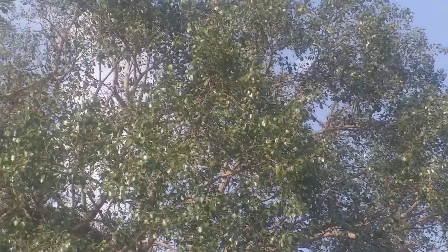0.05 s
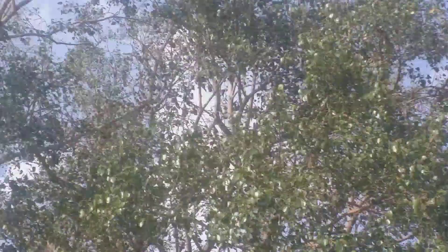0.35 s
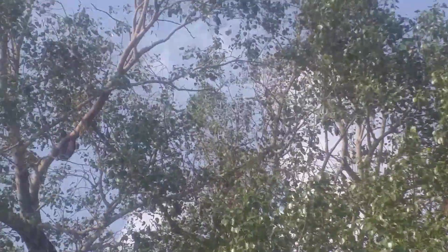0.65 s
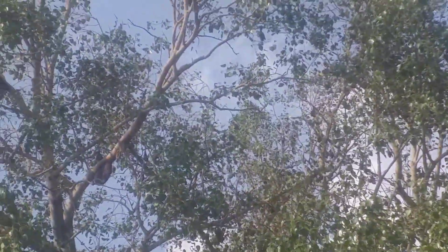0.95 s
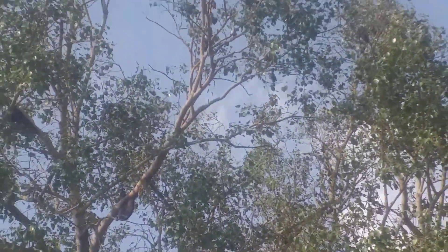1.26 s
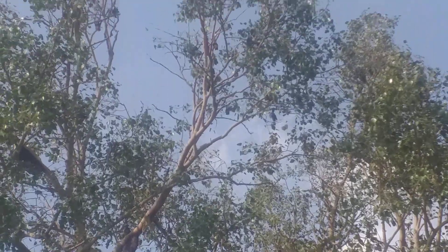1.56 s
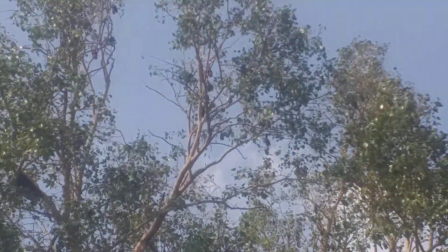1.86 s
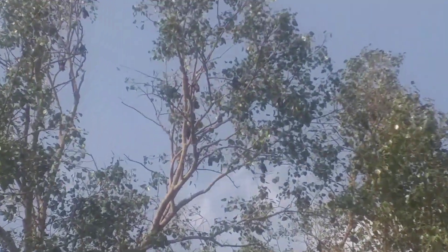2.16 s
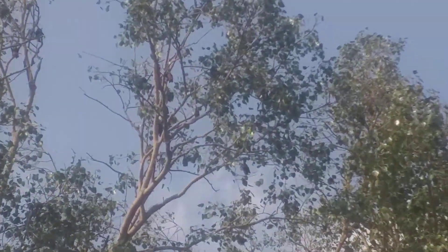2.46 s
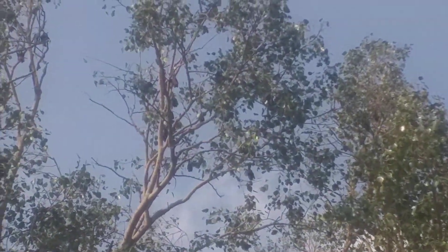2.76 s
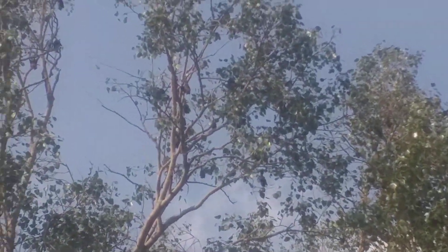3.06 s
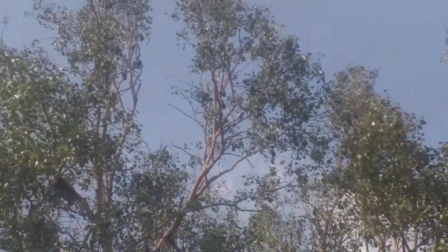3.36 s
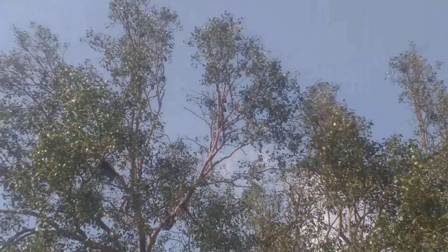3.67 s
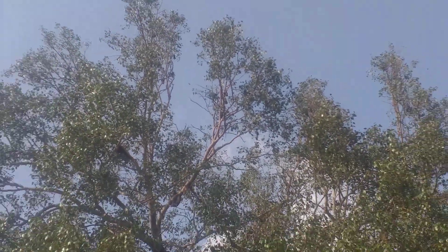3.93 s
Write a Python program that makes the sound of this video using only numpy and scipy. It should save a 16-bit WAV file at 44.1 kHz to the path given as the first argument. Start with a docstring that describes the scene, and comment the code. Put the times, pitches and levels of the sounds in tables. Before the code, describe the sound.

A bat or bird screeches once outdoors while insects buzz and the microphone gets bumped.

```python
"""A screech among trees

A bat or a bird gives one harsh screech that holds high, then falls; the trees throw it back.
Insects buzz throughout and small birds whistle far off, over a soft wash of outdoor air.
Close by, dry grains of sound make faint rustles, twigs tick, and handling bumps the microphone."""
import sys
import numpy as np
from scipy import signal
from scipy.fft import rfft, irfft
from scipy.io import wavfile
from scipy.ndimage import uniform_filter1d

SR = 44100
rng = np.random.default_rng(int(sys.argv[2]) if len(sys.argv) > 2 else 0)


def wrap_up_sound(samples):
    """Save the sound to the file named by the first command line argument, as 16-bit audio."""
    columns = np.atleast_2d(samples).T
    # keep every value between -1 and 1, then stretch to whole-number steps
    tamed = np.clip(columns, -1, 1)
    steps = np.round(tamed * 32767).astype(np.int16)
    wavfile.write(sys.argv[1], SR, steps)


N = 176400
TIME = np.arange(N) / SR

# The screech. Each row: time in seconds, pitch in Hz, level in dB, rasp from 0 (tone) to 1 (noise).
SCREECH_PATH = [(1.556, 4480, -53, .5), (1.584, 4620, -43, .45), (1.668, 4830, -42, .55),
                (1.688, 4450, -46, .8), (1.735, 4490, -40, .5), (1.75, 3850, -45, .9),
                (1.77, 3250, -44.5, .9), (1.8, 2720, -44, .8), (1.83, 2570, -46, .65),
                (1.862, 2570, -51, .55), (1.895, 2500, -68, .5)]
# Its harmonics. Each row: multiple of the pitch, width in Hz, relative level in dB.
HARMONICS = [(1, 280, -1.5), (2, 1500, -15), (3, 3000, -18)]
# Where the throat rings. Each row: frequency in Hz, width in Hz, dB at high pitch, dB at low pitch.
THROAT_RINGS = [(2850, 280, -19, -10), (4000, 1300, -26, -8), (4860, 300, -8, -9), (5450, 900, -6, -9),
                (6600, 1300, -5, -1.5), (14200, 2000, -21, -20)]
# The echo of the trees. Each row: frequency in Hz, seconds it takes to fade by 60 dB.
ECHO_FADE = [(2700, 0.49), (5500, 0.52), (15000, 0.35)]
# The nearest insect. Each row: time in seconds, pitch in Hz, level in dB.
BUZZ_PATH = [(0, 6950, -65), (1.15, 7080, -57), (1.9, 6880, -60.5), (2.66, 7060, -54.5),
             (2.78, 7540, -56.5), (2.86, 6300, -62), (3.16, 7050, -58), (3.66, 7110, -53),
             (3.88, 7140, -73)]
# The insect chorus. Each row: pitch in Hz, width in Hz, level in dB.
CHORUS_BANDS = [(6994, 510, -62), (7530, 300, -64.5), (6560, 700, -64), (9520, 830, -73.5),
                (4780, 820, -70.5)]
# Bird whistles. Each row: start and length in seconds, first, middle and last pitch in Hz, level in dB.
BIRD_WHISTLES = [(0.243, 0.062, 2780, 3320, 2900, -63), (1.058, 0.062, 3200, 3035, 3000, -65.5),
                 (2.036, 0.082, 2280, 2043, 1977, -64), (3.117, .1, 2860, 2735, 2790, -60.5)]
# Bumps on the microphone. Each row: time in seconds, level in dB.
BUMPS = [(.765, -44), (0.913, -47.5), (1.103, -46), (1.398, -45), (1.61, -41), (1.709, -40.5),
         (1.826, -38.5), (2.073, -44), (2.143, -43), (2.217, -32), (2.247, -32), (2.309, -41), (2.425, -36),
         (2.518, -36.5), (2.573, -35.5), (2.682, -40), (2.875, -38.5), (2.964, -28.5), (3.015, -30.5),
         (3.039, -31), (3.076, -36), (3.318, -27), (3.349, -36.5), (3.413, -42.5), (3.845, -43)]
# The rumble under them. Each row: time in seconds, level in dB.
RUMBLE_LEVELS = [(0, -67), (1.5, -62.5), (2.5, -47), (2.77, -56.5), (3.02, -45.5), (3.45, -61.5)]
# Rustles. Each row: peak time, rise and fall in seconds, level in dB, treble over bass in dB.
RUSTLE_SWELLS = [(.46, 0.1, 0.092, -55, 2), (.535, 0.037, 0.022, -54.5, 3), (.83, 0.086, 0.13, -54.5, 6),
                 (1.25, 0.17, 0.67, -56.5, 3.5), (3.79, 0.17, 0.22, -60, -10.5)]
# Twig ticks. Each row: time in seconds, level in dB, pitch in Hz.
TWIG_TICKS = [(0.43, -47, 4130), (0.5157, -39, 4860), (0.538, -46, 4460), (0.884, -43, 5100),
              (0.952, -45, 4900), (1.1088, -38.5, 4200), (1.136, -45, 5500), (3.805, -40.5, 3770)]
# The tone of the rumble, the rustles and the air. Each row: frequency in Hz, relative level in dB.
RUMBLE_TONE = [(85, 3), (260, -21), (450, -35), (1000, -56)]
RUSTLE_TONE = [(300, -25), (1700, -17.5), (4200, 0.5), (6000, 1.5), (8500, -10.5), (11000, -9), (13500, -5)]
AIR_TONE = [(25, -10), (70, 8), (500, -1.5), (1700, -3.5), (3100, 4), (4400, 10), (5500, 5.5), (10000, 2),
            (12000, -8), (15500, -4.5)]


def screech(pulses_per_s=670, high_hz=4200, low_hz=2960, shrill_below_hz=2770):
    """A shaky tone breaks up into uneven pulses that make its harmonics and the throat ring."""
    hz, db, rasp = curve(SCREECH_PATH)
    pulses = (rng.random(N) < pulses_per_s / SR) * amp(0.5 * noise())
    drive = unit(pulses) + noise()
    shaky_hz = hz * (1 + 0.0179 * wander(375) + .05 * rasp ** 4 * wander(840))
    phase = 2 * np.pi * np.cumsum(shaky_hz) / SR
    voice = np.zeros(N)
    for multiple, width, level in HARMONICS:
        clear = np.sqrt(2) * np.sin(round(multiple) * phase)
        rough = resonate(drive, round(multiple) * shaky_hz, width)
        voice += amp(level) * (np.sqrt(1 - rasp) * clear + np.sqrt(rasp) * rough)
    # A shrill overtone opens as the pitch sinks.
    opening = np.clip((shrill_below_hz - hz) / 130, 0, 1)
    voice += opening * resonate(drive, 2.2 * hz, width=340)
    fallen = np.clip((high_hz - hz) / (high_hz - low_hz), 0, 1)
    for ring_hz, width, high_db, low_db in THROAT_RINGS:
        voice += amp(high_db + (low_db - high_db) * fallen) * resonate(drive, ring_hz, width)
    calling = (TIME > SCREECH_PATH[0][0]) & (TIME < SCREECH_PATH[-1][0])
    voice *= amp(db + wander(170)) * calling
    voice = signal.sosfilt(signal.butter(8, 2050, "high", fs=SR, output="sos"), voice)
    return voice + amp(-5) * tree_echo(voice)


def tree_echo(sound, echoes_per_s=3000):
    """Trunks and leaves scatter many small echoes; the treble dies first."""
    echoes = rng.standard_normal(SR) * (rng.random(SR) < echoes_per_s / SR)
    hz, seconds, spectrum = signal.stft(echoes, SR, nperseg=256)
    fade = amp(-60 * seconds / value_at(ECHO_FADE, hz)[:, None])
    tail = signal.istft(spectrum * fade, SR, nperseg=256)[1]
    return signal.fftconvolve(sound, tail / np.linalg.norm(tail))[:N]


def insects(pulses_per_s=156, chirp_start_s=3.0, chirps_per_s=7.5):
    """A near insect buzzes in fast pulses over a chorus; another joins with chirps."""
    hz, db = curve(BUZZ_PATH)
    cycle = np.cumsum(pulses_per_s * (1 + 0.021 * wander(12))) / SR % 1
    out = amp(db) * resonate(np.exp(-cycle / .42) * noise(), hz, width=440)
    for band_hz, width, level in CHORUS_BANDS:
        out += amp(level + 1.18 * wander(11)) * resonate(noise(), band_hz, width)
    chirps = np.sin(np.pi * chirps_per_s * np.maximum(TIME - chirp_start_s, 0)) ** 2
    return out + amp(-66) * chirps * resonate(noise(), hz=7970, width=230)


def birds(flock_hz=2350, flock_db=-80.5):
    """Short whistles bend in pitch and echo; a farther flock blurs into faint chatter."""
    waver = 1 + .011 * wander(170)
    flock_gain = amp(flock_db + 3.6 * wander(7.9))
    out = flock_gain * resonate(noise(), flock_hz * (1 + 0.086 * wander(9.2)), width=236)
    for start, length, first, middle, last, db in BIRD_WHISTLES:
        on = (TIME > start) & (TIME < start + length)
        progress = (TIME[on] - start) / length
        bend = np.polyfit([0, .5, 1], [first, middle, last], 2)
        hz = np.polyval(bend, progress) * waver[on]
        swell = np.sqrt(np.sin(np.pi * progress))
        out[on] += amp(db) * swell * np.sin(2 * np.pi * np.cumsum(hz) / SR)
    return out + amp(-3) * tree_echo(out)


def handling(rise_cycles=0.36, fall_cycles=0.67, knock_db=-14.5):
    """Each bump rocks the microphone for a cycle or two and knocks its casing, over a low rumble."""
    out = amp(curve(RUMBLE_LEVELS)[0] + 4.0 * wander(38)) * colour(noise(), RUMBLE_TONE)
    bumps = [(when, db, 205.9 + 3 * db) for when, db in BUMPS]  # harder bumps sound higher
    light_bump = (.378, -54, 190)
    for when, db, hz in bumps + [light_bump]:
        cycles = np.clip((TIME - when) * hz, -20, 20)
        push = 2 / (np.exp(-cycles / rise_cycles) + np.exp(cycles / fall_cycles))
        phase = 2 * np.pi * (cycles + rng.random())
        knock = amp(knock_db) * push ** 2 * np.sin(1.97 * phase)
        out += amp(db) * (push * np.sin(phase) + knock)
    return signal.sosfiltfilt(signal.butter(6, 42, "high", fs=SR, output="sos"), out)


def rustles_and_ticks(grains_per_s=2500, treble_hz=8500, tick_rise_s=.0004, tick_fade_s=0.0045):
    """Tiny dry grains come in swells; ticks, as of dry twigs, each ring at their own pitch."""
    grains = (rng.random(N) < grains_per_s / SR) * rng.choice([-1, 1], N)
    grains = grains * amp(3.5 * np.minimum(rng.exponential(1, N), 4))  # a few stand out
    crackle = colour(unit(grains) + noise(), RUSTLE_TONE) * amp(1.26 * wander(90))
    body = signal.sosfiltfilt(signal.butter(2, treble_hz, fs=SR, output="sos"), crackle)
    treble = crackle - body
    out = np.zeros(N)
    for peak, rise, fall, db, tilt_db in RUSTLE_SWELLS:
        swell = np.exp(-((TIME - peak) / np.where(TIME < peak, rise, fall)) ** 2)
        out += swell * amp(db) * (amp(-tilt_db / 2) * body + amp(tilt_db / 2) * treble)
    for when, db, hz in TWIG_TICKS:
        snap = np.clip((TIME - when) / tick_rise_s, 0, 1) * np.exp(-abs(TIME - when) / tick_fade_s)
        out += .5 * amp(db) * snap * (resonate(noise(), hz, width=880) + .5 * crackle)
    return out


def air(level_db=-62.5, patchy_db=2.0):
    """Far leaves and wildlife blend into a wash with drifting louder and softer patches."""
    spectrum = signal.stft(noise(), nperseg=1024, noverlap=768)[2]
    patches = uniform_filter1d(rng.standard_normal(spectrum.shape), size=8, axis=0)
    patches = unit(uniform_filter1d(patches, size=14, axis=1))
    wash = signal.istft(spectrum * amp(patchy_db * patches), nperseg=1024, noverlap=768)[1][:N]
    return amp(level_db) * colour(wash, AIR_TONE)


def noise():
    """Fresh, even hiss."""
    return rng.standard_normal(N)


def amp(db):
    """Turns decibels into a number to multiply by."""
    return 10 ** (np.asarray(db) / 20)


def unit(x):
    """Scales a signal to an average strength (rms) of 1."""
    return x / np.sqrt(np.mean(x ** 2) + 1e-20)


def curve(rows):
    """Joins a table's timed rows with straight lines, one curve per column."""
    seconds, *columns = np.transpose(rows)
    return [np.interp(TIME, seconds, column) for column in columns]


def value_at(points, hz):
    """Looks up a frequency in a table, blending between rows."""
    row_hz, value = np.transpose(points)
    return np.interp(np.log(hz + 1), np.log(row_hz), value)


def colour(x, tone):
    """Gives a sound the tone set out in a table, at strength 1."""
    gain = amp(value_at(tone, np.fft.rfftfreq(N, 1 / SR)))
    return unit(irfft(rfft(x) * gain, N))


def wander(per_s):
    """A smooth random wobble, up to about per_s times a second, at strength 1."""
    damping = 1 + (np.fft.rfftfreq(N, 1 / SR) / per_s) ** 4
    return unit(irfft(rfft(noise()) / damping, N))


def resonate(x, hz, width):
    """Makes a sound ring around a steady or moving pitch, at strength 1; width is in Hz."""
    turn = np.exp(2j * np.pi * np.cumsum(hz * np.ones(N)) / SR)
    hold = np.exp(-2 * np.pi * width / SR)
    shifted = x / turn + 1e-18  # slide the pitch down to zero, smooth, then slide back
    for _ in range(4):
        shifted = signal.lfilter([1 - hold], [1, -hold], shifted)
    return unit((shifted * turn).real)


def scene():
    """All the sources add up at one microphone."""
    return (screech() + insects() + birds() + air() + rustles_and_ticks() + handling())[None]


def record(dry, start_db=-2, ease_s=0.26, top_hz=15730):
    """The level eases in, and the very highest treble is cut off."""
    eased = dry * amp(start_db * np.maximum(1 - TIME / ease_s, 0))
    treble_cut = signal.firwin(801, top_hz, window=("kaiser", 9), fs=SR)
    return signal.oaconvolve(eased, treble_cut[None], "same")


dry = scene()
out = record(dry)
wrap_up_sound(out)
```